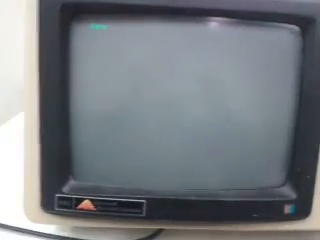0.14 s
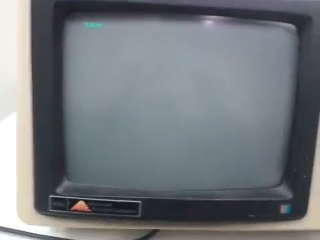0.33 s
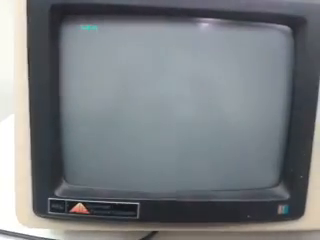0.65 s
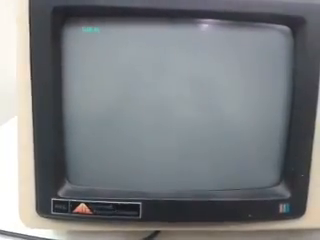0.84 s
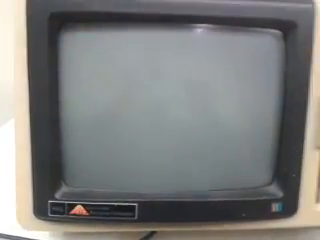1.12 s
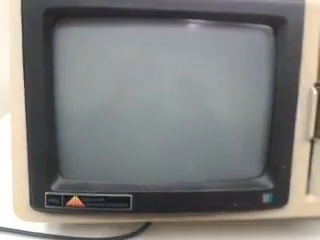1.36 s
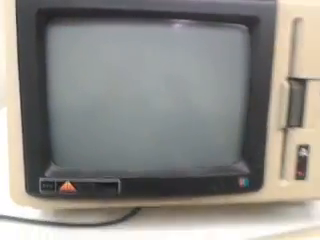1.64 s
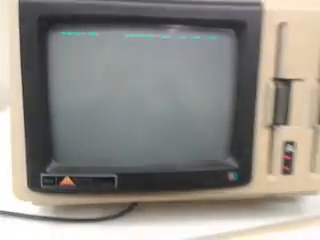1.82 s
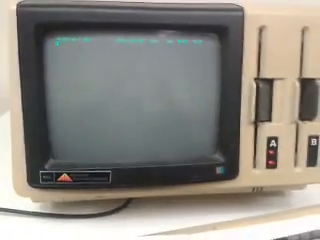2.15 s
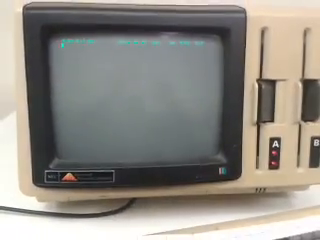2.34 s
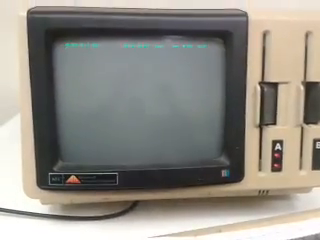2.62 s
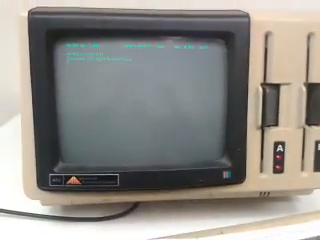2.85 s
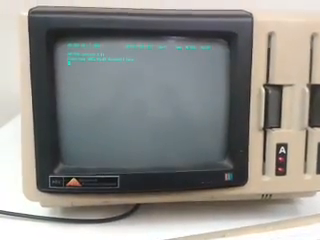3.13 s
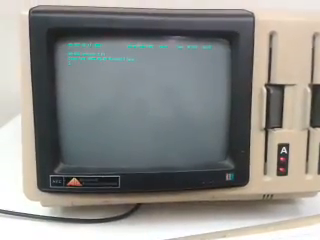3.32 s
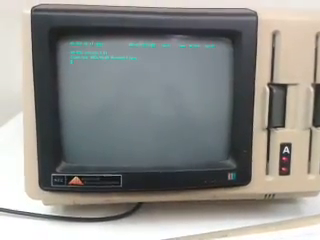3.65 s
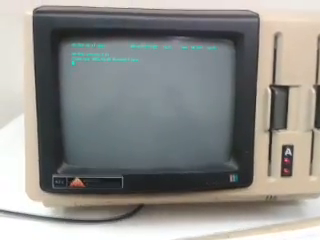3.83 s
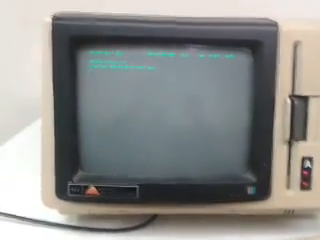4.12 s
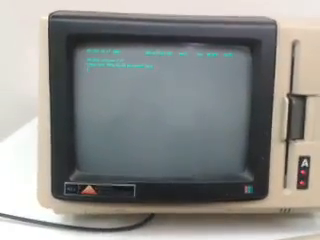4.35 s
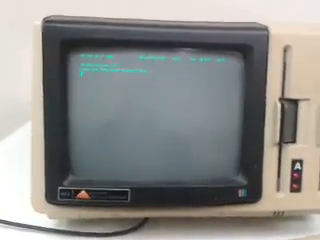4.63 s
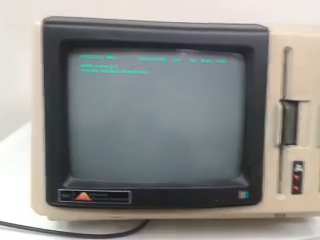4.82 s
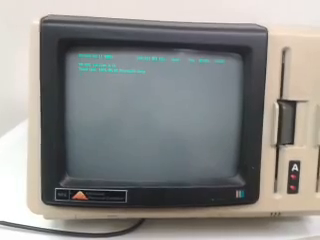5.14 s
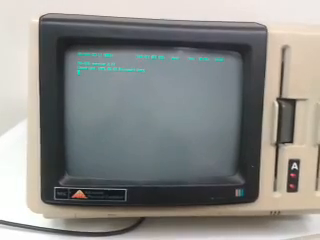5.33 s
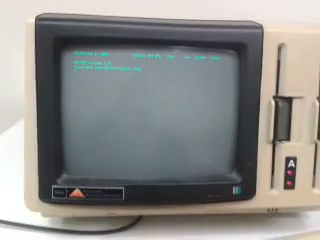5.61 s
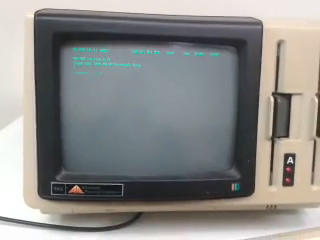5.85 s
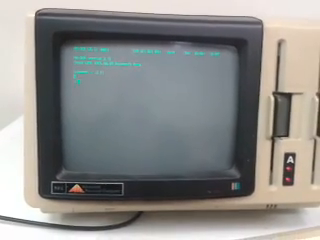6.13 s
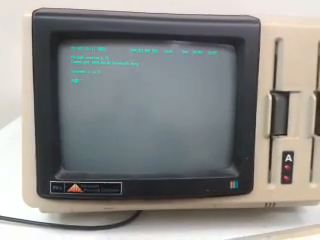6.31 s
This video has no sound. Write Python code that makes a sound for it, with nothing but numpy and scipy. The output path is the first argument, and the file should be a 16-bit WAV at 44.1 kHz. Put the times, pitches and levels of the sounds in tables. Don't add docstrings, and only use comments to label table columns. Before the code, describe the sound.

A large floppy drive in an old computer works in a small room, heard by a hand-held camera a step away. Faint fan wash, hiss and spindle hum run throughout. Soft sleeve brushes and low hand rumble fade during the first second. Short hollow clunks come at 0.3 and 0.8, then a faint creep into a hard clack at 1.3. Another knock with a metallic ping at 1.8 leads to a sharp double solenoid clack at 2.05, then steps at 2.15 and 2.5. A dense clatter with a second bright chink falls around 3.0; louder rattling clunks cluster at 3.5, 3.6 and 3.75. Close dry plastic ticks crackle from 3.9 to 4.15, the last strongest. Further clunks follow at 4.2, 4.6, 4.9, 5.55, 6.0 and a longer rattle at 6.25, with a faint palm slide to the end at about 6.5.

```python
import sys
import numpy as np
from scipy import signal
from scipy.fft import rfft, irfft
from scipy.io import wavfile
from scipy.ndimage import uniform_filter1d

SR = 44100
rng = np.random.default_rng(int(sys.argv[2]) if len(sys.argv) > 2 else 0)


def to_linear_factor(level_db):
    exponent = np.asarray(level_db, float) / 20
    return 10 ** exponent


def int16_out(signal):
    q = np.round(np.clip(np.atleast_2d(signal).T, -1, 1) * 32767)
    wavfile.write(sys.argv[1], SR, q.astype(np.int16))


N = 285309
T = np.arange(N) / SR

# centre_hz, level_db_per_hz
AIR_SPECTRUM = [(110, -56.5), (130, -22.5), (190, -11.5), (300, -11), (420, -7.5), (590, -27.5),
                (850, -12.5), (1200, -13.5), (1700, -12.5), (2400, -16.5), (3200, -19), (5000, -23),
                (7300, -22.5)]
AIR_DB, AIR_SHARE = -59, 0.21
# time_s, level_db
NEARNESS = [
    (0, 1.5),
    (1.3, -0.5),
    (2, 2.5),
    (3.5, 2),
    (4.7, 0),
    (5.2, -5),
    (6.47, 0),
]

# middle_s, half_length_s, level_db
BRUSHES = [
    (.03, .02, -50.5),
    (.06, 0.027, -48),
    (.14, 0.023, -52.5),
    (.25, 0.16, -59),
    (.47, 0.036, -59),
    (.63, .06, -57),
    (.78, 0.11, -57.5),
    (4.85, 0.11, -63.5),
]
# middle_s, half_length_s, level_db
SLEEVE_RUBS = [
    (4.05, 0.073, -71),
    (4.45, .25, -64),
    (6.42, 0.26, -59.5),
]
RUMBLE_DB, UNSETTLED_DB, SETTLE_S = -72, 13, 0.95
SHUFFLE_DB = -61.5

# pitch_hz, rms_db
FAN_LINES = [(301.5, -71), (490, -67.5), (588, -63.5)]
# pitch_hz, rms_db
MAINS_LINES = [(25, -75), (50, -80)]
# multiple, rms_db
SPINDLE_HARMONICS = [(7, -71), (8, -70), (9, -68), (10, -80.5), (11, -73), (12, -84), (13, -75.5),
                     (14, -77)]
SPINDLE_HZ = 188.6

# start_s, peak_db, low_rel_db
TICKS = [
    (3.4316, -58, 7),
    (3.9326, -50.5, -14),
    (3.947, -48, -12),
    (4.0155, -51, -12),
    (4.043, -40, -9),
    (4.0747, -28.5, -25),
    (4.0939, -28, -2.5),
    (4.114, -48, -5),
    (4.136, -21.5, -12),
    (5.4376, -44.5, -22),
]
CREAK_DB, CREAK_SHARE = -34.5, 0.59

# start_s, peak_db
DRONES = [(0.326, -60), (0.834, -59.5), (2.521, -64), (2.99, -58.5), (3.503, -61.5), (3.614, -61),
          (3.767, -60.5), (4.205, -62), (4.941, -60), (5.551, -61.5), (6.006, -72.5), (6.253, -66.5)]
DRONE_HZ, DRONE_S = 124, 0.11

# pitch_hz, split_hz, level_db, t60_s
SPRING = (5870, 14, -51, .7)
ARMATURE_HZ, ARMATURE_DB = (6750, 6810), -23

# start_s, peak_db, pitch_hz, upper_rel_db
PINGS = [(0.3262, -31, 2167, -2.5), (0.8325, -33, 2224, -4), (1.8302, -21, 2220, -11.5),
         (2.1425, -28, 2290, 1), (2.9756, -20.5, 2145, -12.5), (3.015, -28.5, 2260, 10),
         (3.4915, -27.5, 2114, -2.5), (3.6017, -26.5, 2170, -17), (3.7524, -30, 2070, 1),
         (4.6074, -38, 2150, -16), (4.9302, -37.5, 2070, 4), (5.9968, -36.5, 2050, -25),
         (6.2514, -35.5, 2180, 4)]
UPPER_PING_HZ = 2805

# start_s, boom_db, metal_rel_db, rattle_s
STEPS = [
    (0.3224, -34, -7, 0.016),
    (0.829, -33.5, -5.5, 0.017),
    (2.1395, -33, -3.3, 0.027),
    (2.514, -35, -5.5, 0.016),
    (3.491, -30, -4, 0.033),
    (3.7523, -30, -4.5, 0.032),
    (4.1984, -33, -7.5, 0.015),
    (4.929, -31.5, -8.5, 0.04),
    (5.547, -35, -10.5, 0.018),
    (6.248, -31, -6, 0.043),
]
# start_s, boom_db, metal_rel_db, rattle_s
RETURNS = [
    (1.3361, -43.5, 7, 0.024),
    (1.826, -36, -3, 0.023),
    (2.9704, -35, -4, 0.024),
    (3.599, -35.5, 2, 0.035),
    (4.603, -37.5, -1, 0.048),
    (5.998, -36.5, -2, 0.045),
]
# start_s, boom_db, metal_rel_db, rattle_s
CREEP = [
    (1.297, -53.5, -9.5, 0.049),
]
# start_s, boom_db, carriage_rel_db, tick_rel_db, rattle_s
LOADS = [
    (2.045, -46.5, -1, 0, 0.024),
    (2.0538, -28.5, 4, 5, 0.022),
    (2.074, -32.5, 0.5, 2, 0.025),
    (3.007, -47, 6, -0.5, 0.0039),
    (3.013, -30.5, -2, 4.5, 0.0024),
    (3.03, -33, 2, 2.5, 0.028),
]

# pitch_hz, width_hz, level_db
STEP_MODES = [(345, 16, -13), (754, 48, 0), (980, 33, -6), (1250, 76, -12), (1560, 25, -12),
              (1720, 120, -10), (2170, 74, -12), (2800, 54, -12), (3430, 29, -15), (3660, 31, -17),
              (4340, 76, -21), (4670, 37, -25), (5010, 160, -26), (5420, 300, -21), (6010, 71, -23),
              (6680, 65, -24), (6830, 50, -21), (7030, 38, -20)]
# pitch_hz, width_hz, level_db
RETURN_MODES = [(350, 20, -7), (533, 27, -4), (748, 76, 0), (1070, 44, -3), (1250, 140, -3), (1670, 41, -5),
                (2150, 56, 0), (2800, 79, -6), (3190, 160, -13), (3800, 55, -10), (4380, 46, -15),
                (4540, 31, -17), (5110, 27, -17), (5510, 150, -14), (6020, 49, -15), (6270, 39, -17),
                (6520, 21, -16), (6970, 170, -12)]
# pitch_hz, width_hz, level_db
LOAD_MODES = [(754, 88, 0), (1090, 35, -1), (1360, 58, 0), (1650, 120, -4), (1990, 33, -3), (2420, 41, -5),
              (2660, 18, -5), (2790, 86, -4), (3050, 60, -8), (3400, 28, -9), (3650, 130, -11),
              (4090, 48, -13), (4800, 37, -9), (5380, 110, -14), (5650, 44, -12), (5820, 25, -12),
              (5930, 15, -13), (6140, 86, -15), (6360, 15, -13), (6650, 70, -7)]
# centre_hz, case_t60_s, room_t60_s
CASE_T60 = [(300, 0.41, 0.63), (800, 0.21, 0.52), (2140, 0.029, 0.22), (3940, 0.068, 0.21),
            (7300, 0.058, 0.27)]
# centre_hz, level_db_per_hz
CASE_COLOUR = [(250, 1), (400, -3), (630, -2), (800, 3.5), (1200, -2.5), (2000, -2), (2900, -5.5),
               (3300, -10.5), (5000, -16.5), (6800, -15), (7600, -8.5)]
PART_HZ = [700, 1800, 3100, 6000]

ROOM_DB = -12.5
LEAD_S = 0.005
BOOM_RISE_S = 0.008
RATTLE_EDGE = 2.38
CARRIAGE_DB, CARRIAGE_SHARE = -4, 0.9
STEP_TICK_DB, RETURN_TICK_DB, TICK_DB_PER_S = -18.5, -13.5, 275.5
LOAD_FRAME_DB, LOAD_FRAME_SHARE, FIRM_BLOW_DB = 3.5, 0.6, -31
THUMP_HZ, THUMP_DB, THUMP_RISE_S, THUMP_TAIL = 762.7, 3.5, 0.0064, 0.13
SIDE_HZ, SIDE_DB = 548.7, -3.5
SAMPLING_HZ = 16000


def curve(table, axis=1):
    return np.interp(T, np.array(table)[:, 0], np.array(table)[:, axis])


def on_log(table, hz, axis=1):
    return np.interp(np.log(hz), np.log(np.array(table)[:, 0]), np.array(table)[:, axis])


def unit(x):
    return x / np.sqrt(np.mean(x ** 2))


def band(x, lo_hz, hi_hz, order=2):
    return signal.sosfilt(signal.butter(order, [lo_hz, hi_hz], "band", fs=SR, output="sos"), x)


def noise_band(lo_hz, hi_hz, order=2):
    return band(rng.standard_normal(N), lo_hz, hi_hz, order)


def seconds(length_s):
    return np.arange(int(length_s * SR)) / SR


def sine(hz, t):
    return np.sin(2 * np.pi * hz * t)


def walk(rate_hz):
    k = int(SR / rate_hz)
    held = np.repeat(rng.standard_normal(N // k + 1), k)
    return 1.38 * uniform_filter1d(uniform_filter1d(held, k), k)[:N]


def swells(events):
    return np.sqrt(sum(to_linear_factor(2 * db) * np.exp(-((T - at_s) / half_s) ** 2) for at_s, half_s, db in events))


def add(out, x, at_s):
    i = int(at_s * SR)
    out[i:i + len(x)] += x[:N - i]


def air():
    out = 0
    for hz in 110 * 2 ** np.arange(0, 6.2, 0.5):
        level = to_linear_factor(on_log(AIR_SPECTRUM, hz) + 0.27 * walk(2.8))
        out = out + level * noise_band(hz / 1.158, hz * 1.212)
    mid_rms = np.sqrt(np.mean(band(out, 1000, 7000, order=4) ** 2))
    return out / mid_rms * to_linear_factor(AIR_DB + AIR_SHARE * curve(NEARNESS))


def handling():
    rumble = unit(band(np.cumsum(rng.standard_normal(N)), 12, 61, order=3))
    rumble *= to_linear_factor(RUMBLE_DB + UNSETTLED_DB * np.exp(-T / SETTLE_S) + 1.5 * walk(2.0))
    shuffle = unit(noise_band(503, 608) + 0.62 * noise_band(450, 930))
    shuffle *= to_linear_factor(SHUFFLE_DB + 1.3 * walk(5.2))
    brush = unit(noise_band(490, 970) + 0.38 * noise_band(150, 310))
    brush *= swells(BRUSHES) * to_linear_factor(walk(23.5))
    rub = unit(noise_band(3000, 7000)) * swells(SLEEVE_RUBS) * to_linear_factor(1.2 * walk(15))
    return rumble + shuffle + brush + rub


def hum():
    fan = 0
    for hz, db in FAN_LINES + MAINS_LINES:
        phase = 2 * np.pi * np.cumsum(hz + 1.462 * walk(2.4)) / SR
        fan = fan + to_linear_factor(db + 1.3 * walk(4.3)) * np.sin(phase)
    turn = 2 * np.pi * np.cumsum(SPINDLE_HZ + 0.5 * walk(3)) / SR
    belt = sum(to_linear_factor(db + 1.8 * walk(9)) * np.sin(k * turn + k ** 2) for k, db in SPINDLE_HARMONICS)
    return np.sqrt(2) * (fan + belt * to_linear_factor(curve(NEARNESS)))


def camera_ticks():
    out, t = np.zeros(N), seconds(0.04)
    burst = np.exp(-(t / 0.0014) ** 2)
    for at_s, db, low_db in TICKS:
        noise = rng.standard_normal((4, len(t)))
        high = band(noise[0] * burst, 3900, 9800)
        low = band(noise[1] * burst, 900, 2300)
        add(out, to_linear_factor(db) * high / abs(high).max() + to_linear_factor(db + low_db) * low / abs(low).max(), at_s)
        creak = unit(band(noise[2] * (noise[3] > 1.8), 5300, 7900))
        add(out, to_linear_factor(CREAK_DB + CREAK_SHARE * db) * creak * np.exp(-t[::-1] / 0.02), at_s - t[-1])
    return out


def stepper_drone():
    out, t = np.zeros(N), seconds(0.4)
    swell = (t / 0.045) * np.exp(1 - t / 0.03)
    swell += 0.87 * np.exp(-(t / DRONE_S) ** 4) * np.clip(t / 0.034, 0, 1)
    for at_s, db in DRONES:
        add(out, to_linear_factor(db - 7) * swell * sine(DRONE_HZ, t), at_s)
    return out


def spring_arm():
    out, t = np.zeros(N), seconds(0.6)
    hz, split_hz, db, t60_s = SPRING
    song = sine(hz, t) + 0.5 * sine(hz + split_hz, t)
    for at_s in (LOADS[1][0], LOADS[4][0]):
        add(out, to_linear_factor(db) * np.exp(-np.log(1000) * t / t60_s) * song, at_s)
    return out


def armature():
    out, t = np.zeros(N), seconds(0.05)
    chink = sum(sine(hz, t) for hz in ARMATURE_HZ) * (t / 0.0032) * np.exp(1 - t / 0.0029)
    for at_s in (LOADS[1][0], LOADS[4][0]):
        add(out, to_linear_factor(ARMATURE_DB) * chink, at_s)
    return out


def rod_pings():
    out, t = np.zeros(N), seconds(0.1)
    swell = (t / 0.0036) * np.exp(1 - t / 0.0041)
    for at_s, db, hz, upper_db in PINGS:
        upper = to_linear_factor(upper_db) * sine(UPPER_PING_HZ, t) * (swell + 0.22 * np.exp(-t / 0.02))
        add(out, to_linear_factor(db - 5.0) * (swell * sine(hz, t) + upper), at_s - 0.0025)
    return out


def case_thump():
    out, t = np.zeros(N), seconds(0.2)
    tail = THUMP_TAIL * np.exp(-t / 0.027) * np.clip(t / 0.02, 0, 1)
    for moves, hz, panel_db in ((STEPS, THUMP_HZ, THUMP_DB), (STEPS + RETURNS, SIDE_HZ, SIDE_DB)):
        luck = rng.uniform(-1, 1, (len(moves), 2))
        for (at_s, db, _, rattle_s), (off, more) in zip(moves, luck):
            rise = t / (THUMP_RISE_S * np.sqrt(rattle_s / 0.019))
            swell = rise ** 2 * np.exp(2 - 2 * rise) + tail
            add(out, to_linear_factor(db + panel_db + 1.2 * more) * swell * sine(hz * (1 + 0.014 * off), t), at_s)
    return out


def ring(knocks, modes):
    out = 0
    for (hz, width_hz, db), (more, off) in zip(modes, rng.standard_normal((len(modes), 2))):
        damping = np.pi * max(0.6 * width_hz, hz / 55)
        pole = np.exp((2j * np.pi * hz * (1 + 0.005 * off) - damping) / SR)
        tone = signal.lfilter([1], [1, -pole], knocks).imag
        out = out + to_linear_factor(db + 2.45 * more) * np.sqrt(width_hz) * unit(tone)
    return unit(out)


def linger(power, t60_s):
    keep = np.exp(-2 * np.log(1000) / (t60_s * SR))
    return signal.lfilter([1 - keep], [1, -keep], power)


def dense_case(knocks):
    out = 0
    for hz in 315 * 2 ** np.arange(0, 4.7, 1 / 3):
        case_s, room_s = on_log(CASE_T60, hz), on_log(CASE_T60, hz, axis=2)
        power = linger(linger(knocks ** 2, 12 / hz), case_s)
        power = power + to_linear_factor(2 * ROOM_DB) * linger(power, room_s) * room_s / case_s
        noise = band(rng.standard_normal(len(knocks)), hz / 1.126, hz * 1.105)
        out = out + to_linear_factor(on_log(CASE_COLOUR, hz)) * np.sqrt(power) * noise
    return unit(out)


def split(x):
    log_hz = np.log(np.fft.rfftfreq(len(x), 1 / SR) + 1)
    return [irfft(rfft(x) * np.interp(log_hz, np.log(PART_HZ), share), len(x))
            for share in np.eye(len(PART_HZ))]


def move_parts(moves, tick_db):
    return [(at_s, db, metal_db, CARRIAGE_DB + CARRIAGE_SHARE * metal_db,
             tick_db + TICK_DB_PER_S * rattle_s, rattle_s)
            for at_s, db, metal_db, rattle_s in moves]


def load_parts():
    return [(at_s, db, LOAD_FRAME_DB + LOAD_FRAME_SHARE * (db - FIRM_BLOW_DB), *rest)
            for at_s, db, *rest in LOADS]


def clunks(events, modes, rise_s, strike, strike_s, dense_db, span_s, boom_share_db=0):
    out, t = np.zeros(N), seconds(0.5) - LEAD_S
    level_span = (t > 0) & (t < span_s)
    for at_s, boom_db, *rel_db, rattle_s in events:
        knocks = (rng.random(len(t)) < 0.12) * rng.standard_normal(len(t))
        rattle = np.exp(-np.abs(t / max(rattle_s, 0.002)) ** RATTLE_EDGE)
        knocks *= np.clip(t / rise_s, 0, 1) * (strike * np.exp(-t / strike_s) + rattle)
        boom, *metal = split(ring(knocks, modes) + to_linear_factor(dense_db) * dense_case(knocks))
        boom = boom * np.clip((t + rise_s / 4) / min(BOOM_RISE_S, 2 * rise_s), 0, 1)
        for part, db in zip([boom, *metal], [boom_share_db, *rel_db]):
            rms = np.sqrt(np.mean(part[level_span] ** 2))
            add(out, part * to_linear_factor(boom_db + db) / rms, at_s - LEAD_S - rise_s / 4)
    return band(out, 315, 9000, order=7)


def head_moves():
    back = move_parts(RETURNS, RETURN_TICK_DB)
    steps = clunks(move_parts(STEPS, STEP_TICK_DB), STEP_MODES, rise_s=0.00602, strike=0.9,
                   strike_s=0.006, dense_db=0.34, span_s=0.022, boom_share_db=-4)
    creep = clunks(move_parts(CREEP, STEP_TICK_DB), STEP_MODES, rise_s=0.025, strike=0.1,
                   strike_s=0.006, dense_db=0, span_s=0.025)
    landing = clunks(back[:1], LOAD_MODES, rise_s=0.0015, strike=4,
                     strike_s=0.005, dense_db=0, span_s=0.025)
    returns = clunks(back[1:], RETURN_MODES, rise_s=0.00843, strike=0.49,
                     strike_s=0.0088, dense_db=1.5, span_s=0.022)
    loads = clunks(load_parts(), LOAD_MODES, rise_s=0.002, strike=4,
                   strike_s=0.0035, dense_db=1, span_s=0.008)
    return steps + creep + landing + returns + loads


def scene():
    background = air() + handling() + hum() + camera_ticks()
    drive = stepper_drone() + spring_arm() + armature() + rod_pings() + case_thump() + head_moves()
    return (background + drive)[None]


def roll_off(x):
    return signal.sosfilt(signal.butter(12, 9250, fs=SR, output="sos"), x)


def record(dry):
    kept = signal.sosfilt(signal.cheby1(12, 0.5, 7050, fs=SR, output="sos"), dry)
    top = signal.sosfilt(signal.butter(8, 7400, fs=SR, output="sos"), dry[0])
    mirror = band(top * np.cos(2 * np.pi * SAMPLING_HZ * T), 7500, 9000, order=4)
    return roll_off(kept + to_linear_factor(-28.0) * mirror + 0.0017)


dry = scene()
out = record(dry)
int16_out(out)
```